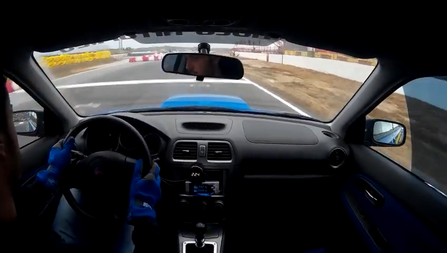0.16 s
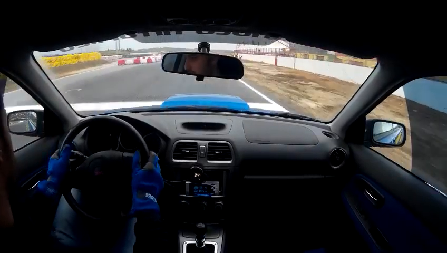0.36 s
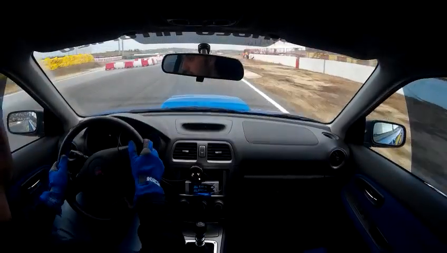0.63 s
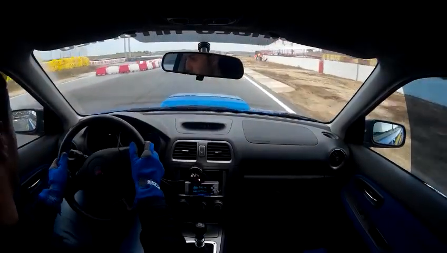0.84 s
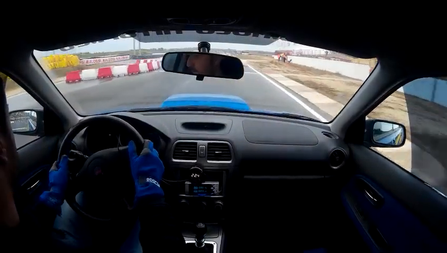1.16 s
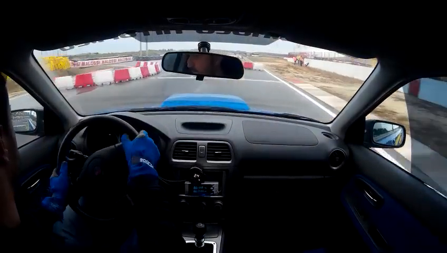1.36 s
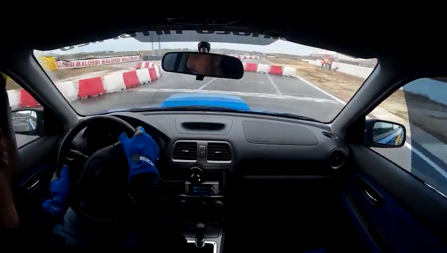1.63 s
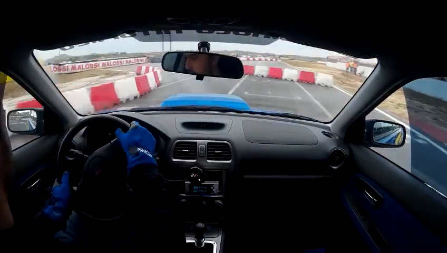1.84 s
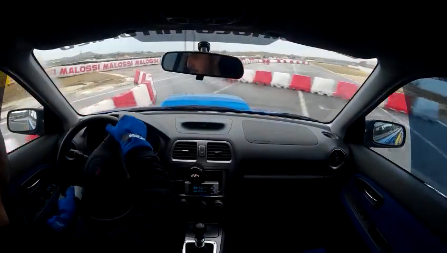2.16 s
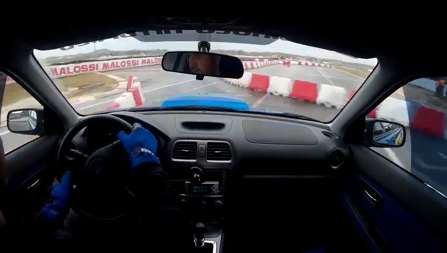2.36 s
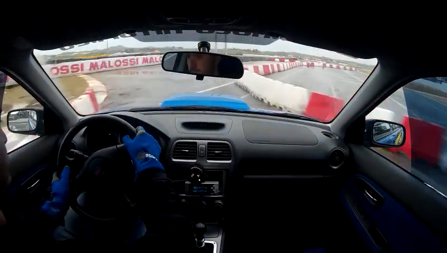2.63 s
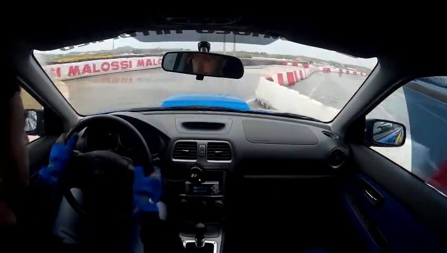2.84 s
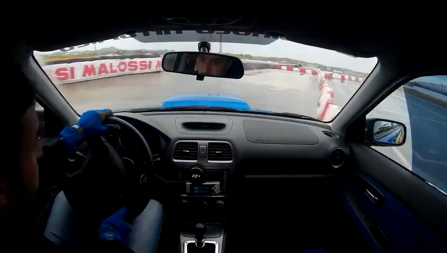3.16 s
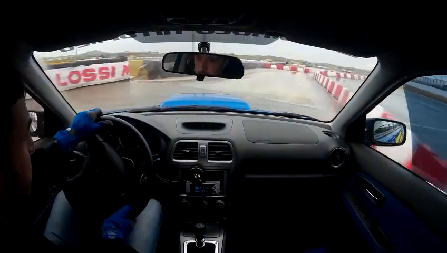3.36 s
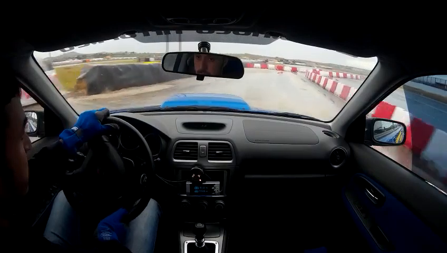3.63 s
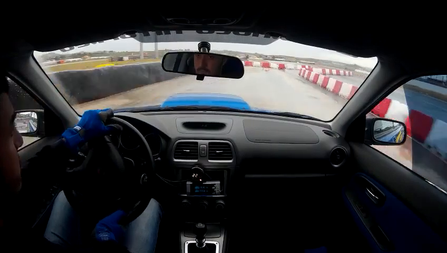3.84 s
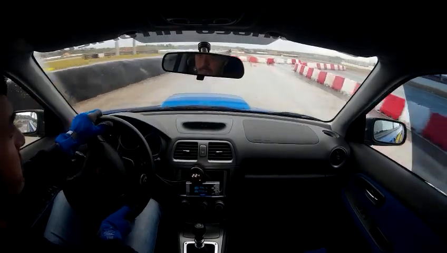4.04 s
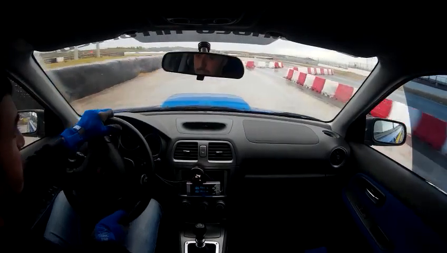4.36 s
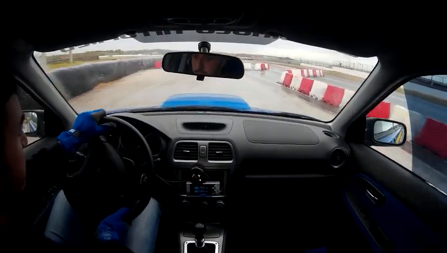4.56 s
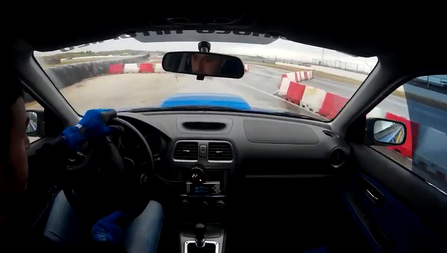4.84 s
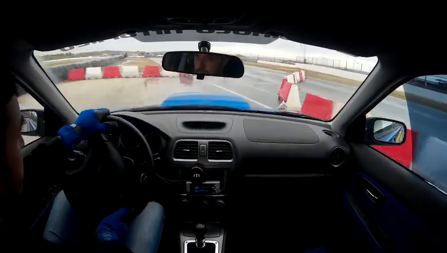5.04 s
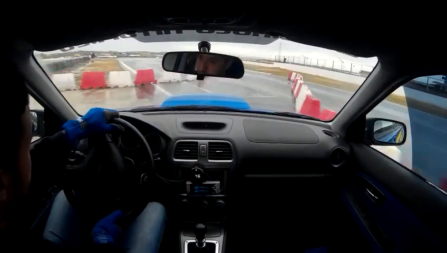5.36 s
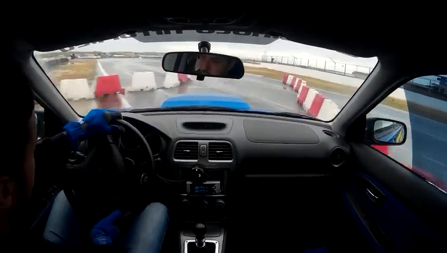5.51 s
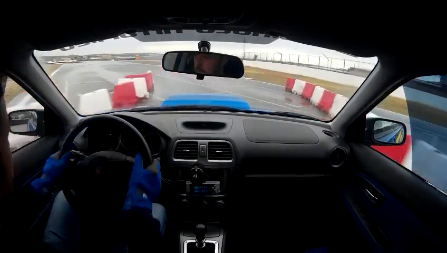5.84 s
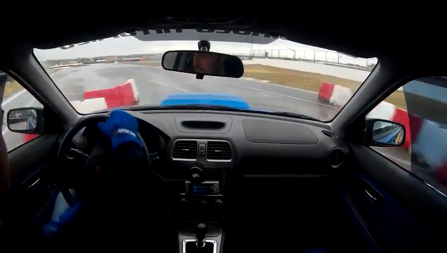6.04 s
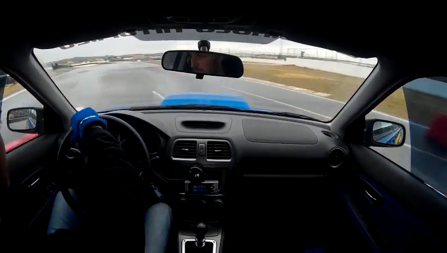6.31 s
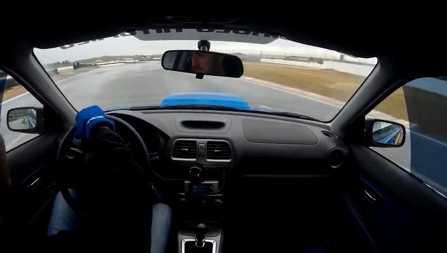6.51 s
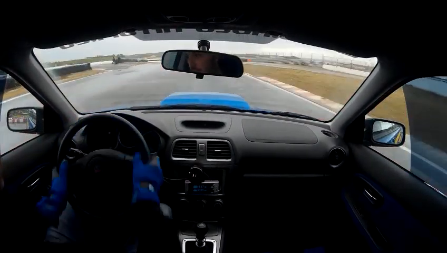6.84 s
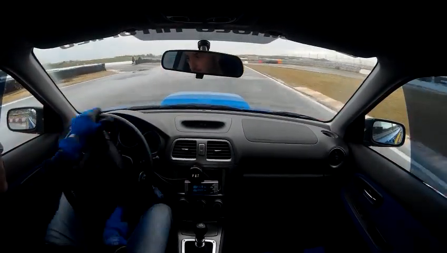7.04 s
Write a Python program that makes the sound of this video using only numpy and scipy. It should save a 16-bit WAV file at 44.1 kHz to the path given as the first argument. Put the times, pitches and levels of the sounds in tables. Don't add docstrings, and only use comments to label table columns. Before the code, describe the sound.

Muffled low engine drone and road boom in a sliding car, clusters of plastic knocks midway, then growling acceleration ending in a jolt and short buzzes.

```python
import sys
import numpy as np
from scipy import signal
from scipy.fft import rfft, irfft, next_fast_len
from scipy.io import wavfile
from scipy.ndimage import map_coordinates

SR = 44100
rng = np.random.default_rng(int(sys.argv[2]) if len(sys.argv) > 2 else 0)


def rack_gain(trim_db):
    fader = np.asarray(trim_db, float)
    return 10 ** (fader / 20)


def persist_wave(psi):
    counts = np.round(np.clip(psi, -1, 1) * 32767).astype(np.int16)
    wavfile.write(sys.argv[1], SR, np.atleast_2d(counts).T)


N = 316638
TIME = np.arange(N) / SR


def unit(x):
    return x / np.sqrt(np.mean(x ** 2) + 1e-20)


def peak(x):
    return x / np.max(np.abs(x))


def curves(rows):
    s, *cols = np.transpose(rows)
    return [np.interp(TIME, s, c) for c in cols]


def wobble(rate):
    knots = rng.standard_normal(int(N * rate / SR) + 4)
    return map_coordinates(knots, [TIME * rate])


def swells(events):
    return sum(rack_gain(2 * db) * np.exp(-((TIME - s) / length) ** 2) for s, db, length in events)


def filtered(x, response):
    m = next_fast_len(len(x) + min(len(x), SR // 2))
    return irfft(rfft(x, m) * response(np.fft.rfftfreq(m, 1 / SR)), m)[:len(x)]


def passed(x, kind, hz, order):
    sos = signal.butter(order, np.clip(hz, 20, .45 * SR), kind, fs=SR, output="sos")
    return signal.sosfilt(sos, x)


def modes(table):
    def response(f):
        return sum((-1) ** k * rack_gain(db) * 1j * f * w / (c * c - f * f + 1j * f * w)
                   for k, (c, w, db) in enumerate(table))
    return response


def coloured(spectrum, source=None):
    hz, db = np.transpose(spectrum)
    x = rng.standard_normal(N) if source is None else source
    return unit(filtered(x, lambda f: rack_gain(np.interp(np.log(f + 1), np.log(hz), db, left=-120, right=-120))))


# [f/Hz, level/dB]
HISS_SPECTRUM = [(1000, -25), (2000, 2), (3500, 0), (9000, -1), (13000, -0.5), (15000, -2), (15600, -9),
                 (16000, -41.5)]


def hiss():
    return rack_gain(-74.5) * coloured(HISS_SPECTRUM)


def boom(table):
    return unit(filtered(rng.standard_normal(N), lambda f: modes(table)(f) ** 2))


# [t/s, tyre roar level/dB, body shake level/dB]
ROAD_LEVELS = [(0, -45.5, -23), (.22, -48, -38.5), (.74, -51, -39), (1.42, -53, -35.5), (1.85, -52.5, -31),
               (2.3, -53.5, -32), (2.9, -53.5, -46), (3.2, -52, -40.5), (3.75, -51.5, -28), (4.3, -48, -35),
               (4.5, -47, -18.5), (4.76, -49.5, -29), (5.4, -49.5, -30), (5.66, -52, -30), (5.94, -52, -42),
               (6.2, -49, -30), (6.7, -47.5, -25), (7.18, -45, -22.5)]
# [t/s, boom level/dB, length/s]
BUMPS = [(.01, -23.5, 0.048), (.6, -30.5, 0.034), (.98, -30, 0.068), (1.8, -30.5, 0.07), (3.28, -31, 0.022),
         (3.42, -33.5, .04), (4.04, -26.5, 0.16), (4.26, -23, 0.039), (4.44, -21, 0.068), (5.04, -27, .06),
         (5.64, -27, .08), (6.18, -27, 0.021), (6.42, -29.5, .04), (6.8, -19, 0.06)]
# [f/Hz, width/Hz, level/dB]
LOW_BOOM = [(80.8, 24.3, 7.5), (44.3, 6.1, -16)]
UPPER_BOOM = [(103.6, 13.5, -2), (126.25, 11.4, -2), (160.4, 18.2, -7), (211, 18, -9)]
# [f/Hz, width/Hz, level/dB]
BOUNCE_MODES = [(21.8, 8.5, -1), (38.8, 13, -6.5)]
# [f/Hz, level per Hz/dB]
ROAR_SPECTRUM = [(140, -26), (230, -2.5), (243, -14.5), (275, -12), (405, -9.5), (464, -13.5), (505, -8),
                 (615, -14), (675, -34), (847, -22.5), (895, -29), (952, -42.5), (1000, -42), (1300, -67.5),
                 (2200, -120)]
# [f/Hz, level per Hz/dB]
SPRAY_SPECTRUM = [(580, -47.5), (980, -17.5), (1060, -18.5), (1190, 6.5), (1370, -6), (1500, -1.5),
                  (1560, -2), (1800, 1), (1860, -1), (2090, -20), (2500, -28.5), (3250, -60.5),
                  (5500, -120)]


def road(phase, throttle_db):
    roar_db, shake_db = curves(ROAD_LEVELS)
    hits = swells(BUMPS)

    def with_hits(db, hit_db):
        return np.sqrt(rack_gain(2 * db) + rack_gain(2 * hit_db) * hits)

    upper_db = roar_db + 18.5 + 0.074 * (shake_db + 24)
    spray_db = -50 - 16 + 0.98 * (roar_db + 50) + 0.18 * (throttle_db + 65)
    bounce_db = -30 - 14.5 + 0.57 * (shake_db + 30)
    rebounds = swells((.14 + k * .25, -32 - k * 2, 0.062) for k in range(4))
    bounce = np.sqrt(rack_gain(2 * bounce_db) + rebounds)

    unevenness_db = 1.2 * wobble(28) + 1.2 * wobble(90)
    beat = 1 + 0.1 * np.cos(phase)
    roar = unit(beat * rack_gain(unevenness_db + 0.34 * wobble(40)) * coloured(ROAR_SPECTRUM))
    spray = unit(beat * rack_gain(1.2 * unevenness_db + 0.37 * wobble(60)) * coloured(SPRAY_SPECTRUM))
    out = with_hits(shake_db, 0.1) * boom(LOW_BOOM)
    out += with_hits(upper_db, -9) * boom(UPPER_BOOM)
    out += with_hits(roar_db, -25.5) * roar
    out += with_hits(spray_db, -43) * spray
    return out + bounce * boom(BOUNCE_MODES)


# [t/s, length/s, level/dB]
RUB_STROKES = [
    (6.809, 0.11, -48.5),
    (7.102, 0.056, -49),
]
# [f/Hz, level per Hz/dB]
RUB_SPECTRUM = [(1200, 3.5), (1700, 6), (2400, -3.5), (3500, -3), (4500, -4), (5500, -11), (7500, -14.5),
                (9500, -31), (12000, -26.5), (15000, -52.5)]


def rubs():
    grains = rng.standard_normal(N) * rack_gain(2.4 * wobble(900))
    swing = (1 + np.cos(2 * np.pi * 91 * TIME + 1.2 * wobble(13))) ** 1.25 + 1.5
    rub = coloured(RUB_SPECTRUM, grains * swing)

    def stroke(t, length):
        attack_s, release_s, sag_db = 0.028, 0.021, -5.5
        rise = np.clip(t / attack_s, 0, 1)
        fall = np.clip((length - t) / release_s, 0, 1)
        return rise * fall * rack_gain(sag_db * np.clip(t / length, 0, 1))

    return sum(rack_gain(db) * stroke(TIME - s, length) for s, length, db in RUB_STROKES) * rub


# [t/s, peak level/dB, f/Hz]
SNAPS = [
    (0.0824, -62.5, 4500),
    (3.9177, -56.5, 4530),
    (4.0786, -50.5, 4380),
    (4.3092, -53.5, 4480),
    (4.3331, -49.5, 4520),
    (4.344, -47, 4500),
    (4.358, -47, 4430),
    (4.3904, -58, 4500),
    (4.4709, -47.5, 4450),
    (5.99, -53.5, 6000),
]
# [t/s, peak level/dB, f/Hz]
CLACKS = [
    (5.9888, -43, 2800),
    (5.994, -51.5, 2600),
    (6.773, -63, 3000),
    (6.794, -52, 2970),
    (6.8066, -51, 3000),
    (7.005, -54.5, 3000),
    (7.078, -59, 3000),
    (7.0975, -48, 3000),
]


def snaps():
    out, t = np.zeros(N + SR), np.arange(2048) / SR
    for s, db, hz in SNAPS + CLACKS:
        flick = rng.standard_normal(len(t)) * rack_gain(-60 * t / .0075)
        ring = modes([(hz, .6 * hz, 0)])
        out[round(s * SR):][:len(t)] += rack_gain(db - 2.7) * peak(filtered(flick, lambda f: ring(f) ** 2))
    return out[:N]


# [t/s, peak level/dB, f/Hz]
THUDS = [(3.9, -38, 420), (4.03, -38, 484), (4.15, -33, 484), (4.21, -35, 480), (0.597, -27.5, 502),
         (0.842, -35, 524), (0.959, -28, 505), (2.047, -21, 509), (3.797, -41, 510), (3.824, -29, 407),
         (4.432, -26, 414), (4.485, -17, 477), (4.996, -38, 535), (6.783, -18, 500)]


def thuds():
    out, t = np.zeros(N + SR), np.arange(2048) / SR
    for s, db, hz in THUDS:
        onset = 1.25 * (1 - np.exp(-t / 0.003))
        out[round(s * SR):][:len(t)] += rack_gain(db - 60 * t / 0.02) * np.sin(2 * np.pi * hz * t) * onset
    return out[:N]


# [t/s, peak level/dB, f/Hz, hardness level/dB]
TICKS = [(.09, -47.5, 1620, -22.5), (.1401, -44.5, 1750, -22), (.171, -46.5, 1160, -32),
         (.5976, -32, 1670, -30.5), (.8584, -45, 1490, -33), (.9593, -44, 1160, -29),
         (.9864, -43, 1180, -36), (2.0459, -43.5, 1230, -46), (2.8549, -46, 1800, -23),
         (3.901, -37, 1590, -29), (3.9482, -49.5, 1770, -30.5), (4.0293, -33, 1210, -23),
         (4.0519, -44, 1680, -22.5), (4.0795, -44, 1468, -10), (2.887, -51, 1590, -24),
         (4.3181, -37.5, 1860, -26), (4.337, -39.5, 1200, -22), (4.3862, -45, 1740, -25),
         (4.4645, -32, 1690, -19), (4.5308, -41, 1740, -26), (4.5844, -46.5, 1705, -28),
         (4.6257, -48.5, 1160, -28), (4.7115, -38.5, 1240, -30), (4.8898, -49.5, 1160, -27),
         (4.9173, -48, 1180, -27), (5.9882, -44.5, 1800, -9), (6.0806, -47, 1170, -27),
         (6.7391, -49.5, 1110, -29), (7.0858, -46, 1680, -19)]
# [t/s, peak level/dB, f/Hz, step to next contact/s (negative: earlier), loss/dB]
RATTLES = [(1.0319, -43, 1700, -0.0063, 11), (3.065, -46.5, 1500, 0.0085, 1),
           (3.825, -28, 1720, -0.009, 15), (4.001, -41, 1680, -0.011, 4), (4.1545, -30, 1670, -0.0029, 3.5),
           (4.1901, -39.5, 1760, -.018, 5.4), (4.2095, -30.5, 1720, 0.0079, 6),
           (4.2863, -36.5, 1290, -.0106, 5), (4.4187, -41, 1790, -0.0052, 1.5),
           (4.4318, -21.5, 1700, 0.009, 6.5), (4.4827, -24.5, 1770, .0115, 3.5),
           (4.6708, -49, 1300, -0.0014, 1), (4.781, -43, 1620, -0.0073, 2.5),
           (4.9986, -34, 1645, -0.0065, 20), (5.4014, -47, 1480, 0.0051, 1),
           (6.7854, -38, 1220, -0.0067, 8)]


def contacts():
    rows = list(TICKS)
    for s, db, hz, step_s, loss_db in RATTLES:
        spots = [hz, *(CASE_MID[k][0] for k in rng.integers(1, 3, size=2))]
        for k in range(3):
            last_loss_db = 5 * (k == 2)
            rows.append((s + k * step_s, db - k * loss_db - last_loss_db, spots[k], -25.5))
    return rows


# [f/Hz, width/Hz, level/dB]
CASE_LOW = [(330, 90, -1), (518, 62, 3), (855, 34, -7)]
CASE_MID = [(1220, 190, -5.5), (1702, 230, 2.5), (1860, 240, -0.5)]
CASE_HIGH = [(2800, 650, 0.58), (3450, 1200, 1), (4540, 810, -1.5)]


def ticks():
    out, t = np.zeros(N + SR), np.arange(2048) / SR
    for s, db, hz, high_db in contacts():
        low_db = -0.66 - 0.3549 * (db + 39.5)
        contact = rng.standard_normal(len(t)) * rack_gain(-60 * t / 0.025) * .17
        contact[0] += 1
        chatter = rng.standard_normal(len(t)) * 0.16 * np.exp(-(t / 0.0053) ** 2)
        own = modes([(hz, 200, -4)])
        body = filtered(contact, lambda f: modes(CASE_MID)(f) + np.sign(1400 - hz) * own(f))
        knock = filtered(contact, modes(CASE_LOW))
        click = filtered(contact + chatter, lambda f: modes(CASE_HIGH)(f) ** 2)
        tick = peak(passed(body, "bandpass", [750, 2150], order=2))
        tick += rack_gain(low_db + 3.0) * peak(passed(knock, "lowpass", 780, order=2))
        tick += rack_gain(high_db + 5.0) * peak(click)
        out[round(s * SR):][:len(t)] += rack_gain(db) * tick
    return passed(out, "lowpass", 4500, order=8)[:N]


# [multiple of firing rate, level under fourth overtone/dB]
GROWL_ORDERS = [(3, -9), (3.5, -9), (4, 0), (4.5, -10), (5, -8), (5.5, -11), (6, 0), (6.5, -8), (9, -7)]
# [f/Hz, width/Hz, level/dB]
CASE_PORT = [(372, 200, -2.5), (493, 128, 1.5), (848, 58, -12.5), (1230, 56, -14.5)]


def intake(phase):
    growl = sum(rack_gain(db + 4.5 * wobble(9)) * np.sin(k * phase + .85 * wobble(14)) for k, db in GROWL_ORDERS)
    rush = 1.4 * unit(passed(rng.standard_normal(N), "bandpass", [600, 1150], order=2))
    return filtered(growl + rush * (1 + 1.1 * np.cos(phase)), modes(CASE_PORT))


# [t/s, firing tone level/dB, intake growl level/dB (the throttle)]
ENGINE_LEVELS = [(0, -22, -69), (.2, -42.5, -62), (.38, -34, -70), (.65, -30, -59.5), (.8, -47.5, -73),
                 (.98, -39, -74), (1.15, -39, -72.5), (2.6, -33, -68.5), (3, -25.5, -65), (4.3, -32.5, -65),
                 (4.8, -27.5, -71.5), (5.15, -27, -66), (5.45, -26, -60.5), (5.85, -32, -60), (6, -42, -71),
                 (6.2, -36, -53.5), (6.6, -40, -46.5), (7.18, -55, -43.5)]
# [t/s, firing rate f/Hz]
FIRING_RATE = [(0, 170), (.12, 168), (.28, 184), (.4, 180), (.6, 166), (.72, 168), (1.03, 157), (1.1, 136),
               (1.45, 125.5), (2, 120), (2.9, 115.5), (3.45, 111.5), (4.3, 107), (5.2, 101), (5.95, 109),
               (6.3, 122), (6.8, 144), (7.1, 152)]
# [t/s, phase/rad]
ROUGHNESS = [(0, .15), (1.2, .1), (3.45, .1), (3.7, .5), (5.1, .5), (5.3, .13), (7.18, .11)]
# [multiple of firing rate, level under firing tone/dB]
SHAFT_ORDERS = [(.25, -26), (.75, -24), (1.5, -30)]
# [f/Hz, width/Hz, level/dB]
HALF_ORDER_MODES = [(78.5, 9, 0), (51, 5, -8)]
SECOND_ORDER_MODES = [(206.9, 20, 0), (280, 10, -8)]


def engine():
    tone_db, throttle_db = curves(ENGINE_LEVELS)
    rate, = curves(FIRING_RATE)
    roughness, = curves(ROUGHNESS)
    phase = 2 * np.pi * np.cumsum(rate) / SR + roughness * wobble(24)
    tone = np.cos(phase) + sum(rack_gain(db) * np.cos(k * phase) for k, db in SHAFT_ORDERS)
    half_db = -31 + 2.5 * wobble(7.4)
    half = np.abs(modes(HALF_ORDER_MODES)(rate / 2)) ** 2 * rack_gain(half_db) * np.cos(phase / 2)
    second_db = -39 + .9 * np.clip(throttle_db + 62, -20, 0) + 2.9 * wobble(6.3)
    second = np.abs(modes(SECOND_ORDER_MODES)(2 * rate)) ** 2 * rack_gain(second_db) * np.sin(2 * phase)
    drone = rack_gain(tone_db) * tone + half + second + rack_gain(throttle_db) * intake(phase)
    return np.sqrt(2) * drone, phase, throttle_db


def scene():
    drone, phase, throttle_db = engine()
    case = rubs() + snaps() + thuds() + ticks()
    return (road(phase, throttle_db) + case + drone)[None]


def low_pass(x):
    return signal.sosfilt(signal.butter(12, 15720, fs=SR, output="sos"), x)


def record(dry):
    return low_pass(dry + hiss())


dry = scene()
out = record(dry)
persist_wave(out)
```